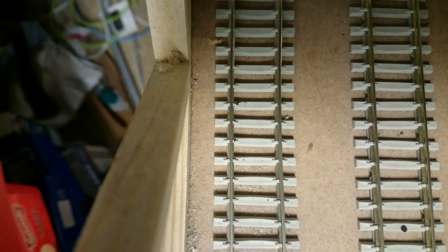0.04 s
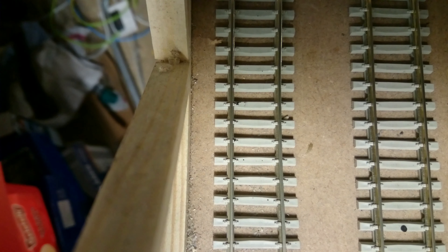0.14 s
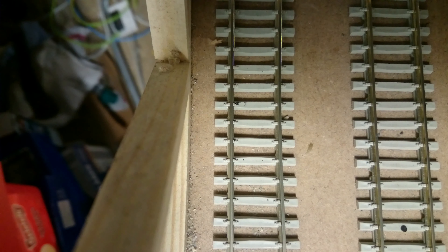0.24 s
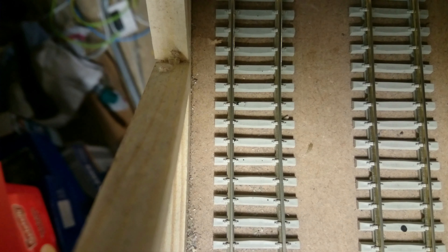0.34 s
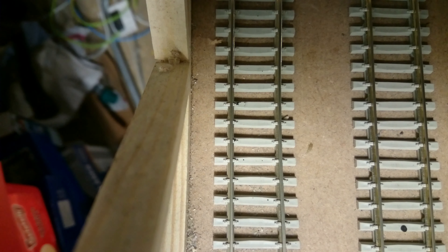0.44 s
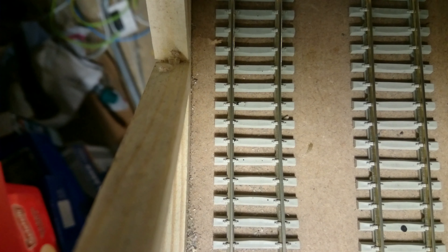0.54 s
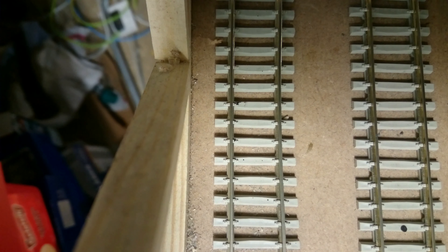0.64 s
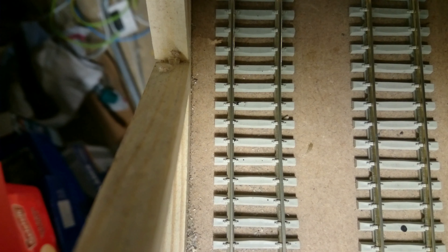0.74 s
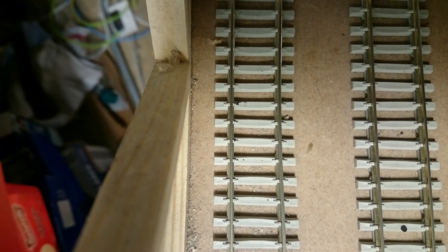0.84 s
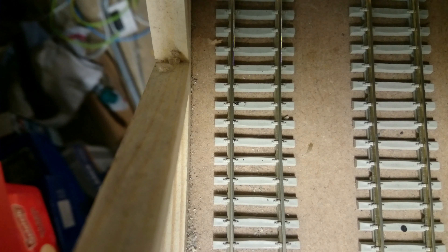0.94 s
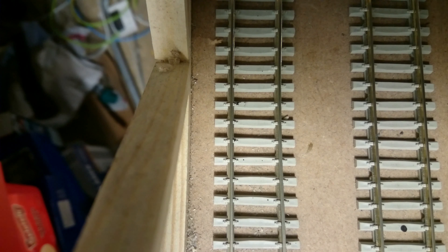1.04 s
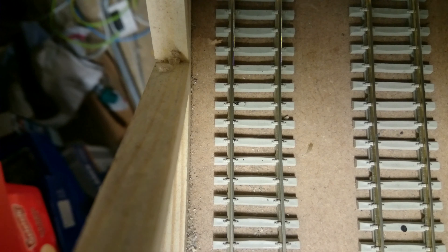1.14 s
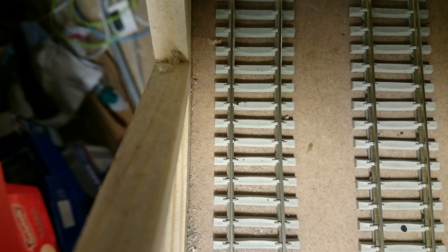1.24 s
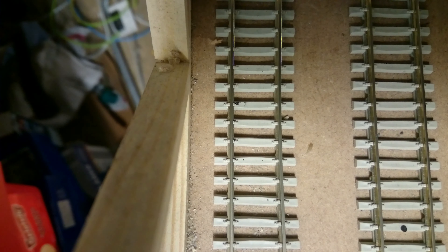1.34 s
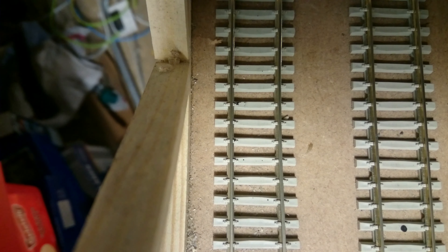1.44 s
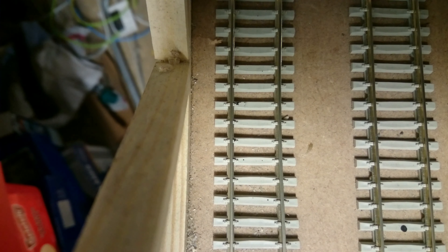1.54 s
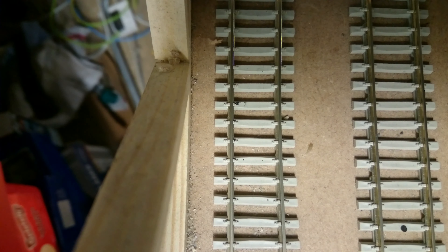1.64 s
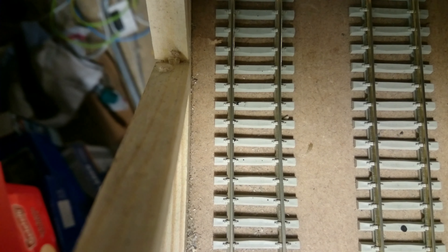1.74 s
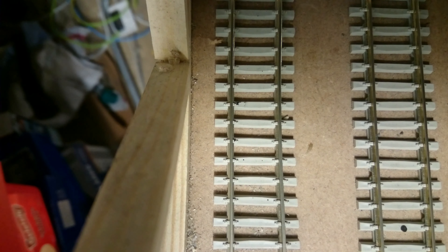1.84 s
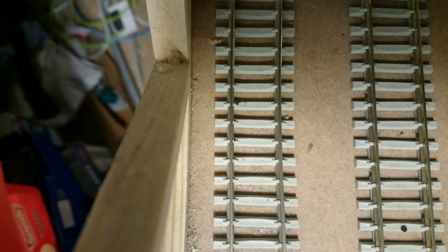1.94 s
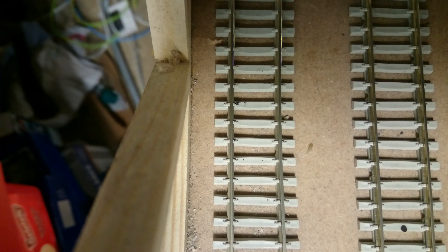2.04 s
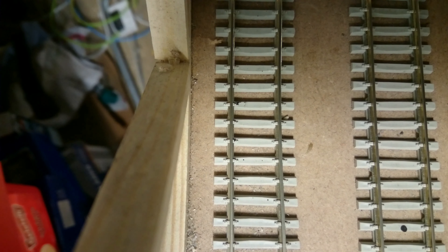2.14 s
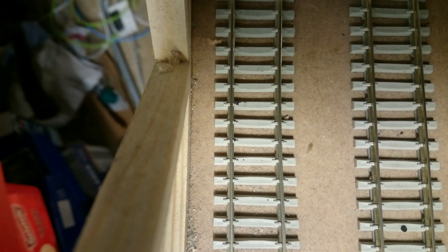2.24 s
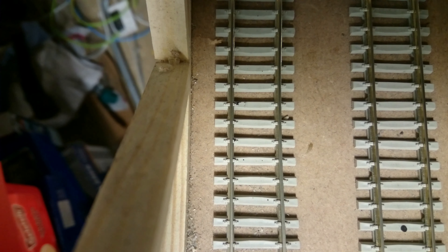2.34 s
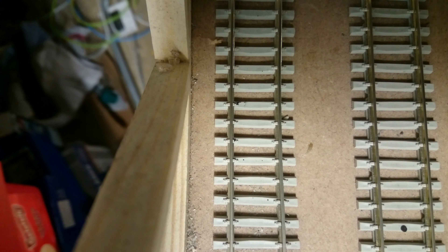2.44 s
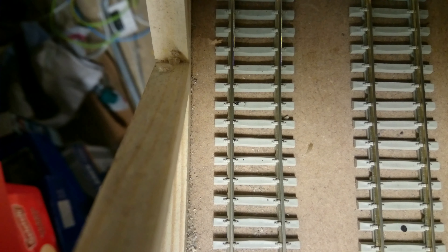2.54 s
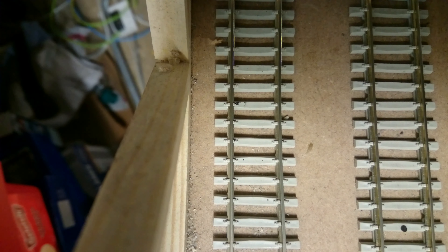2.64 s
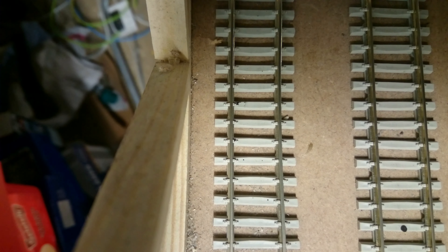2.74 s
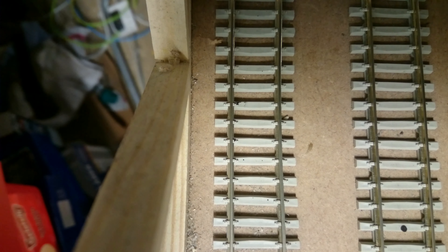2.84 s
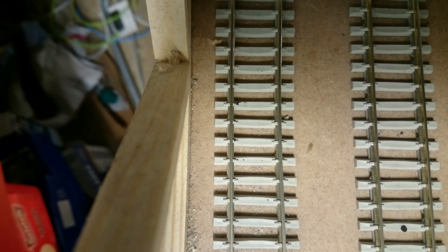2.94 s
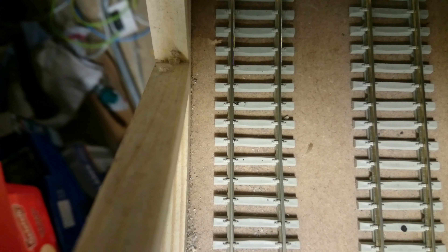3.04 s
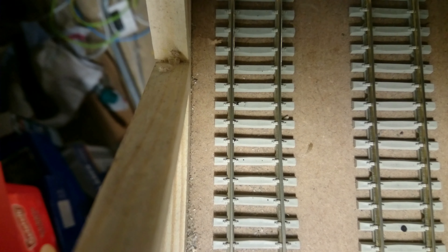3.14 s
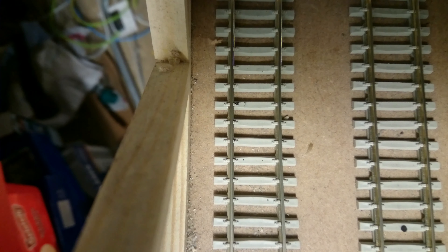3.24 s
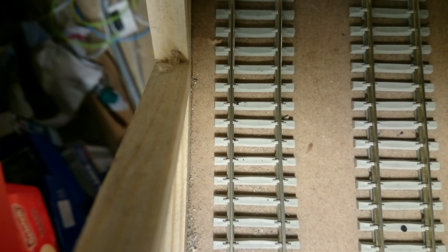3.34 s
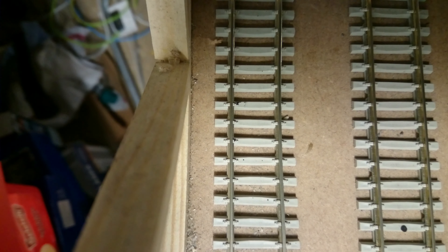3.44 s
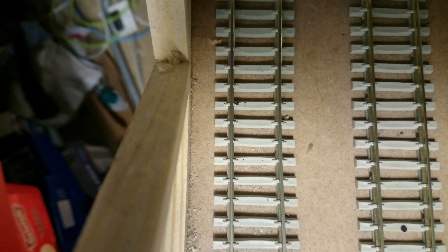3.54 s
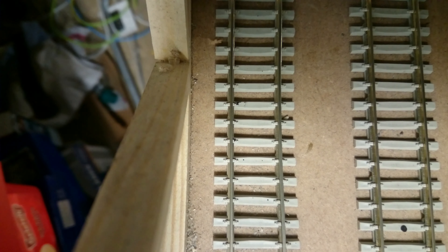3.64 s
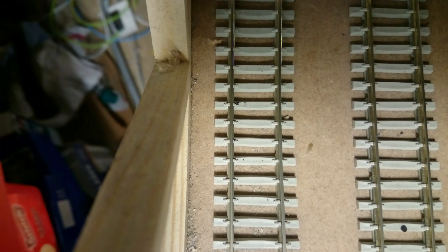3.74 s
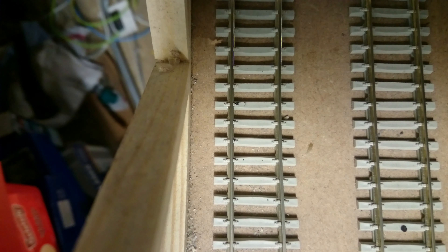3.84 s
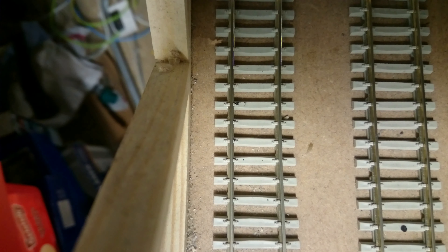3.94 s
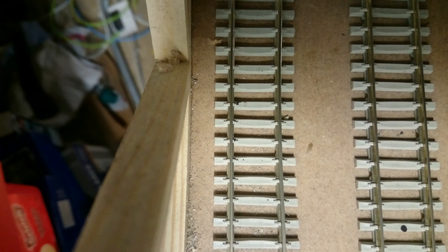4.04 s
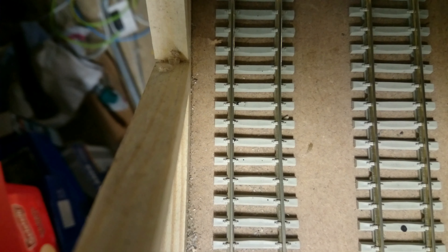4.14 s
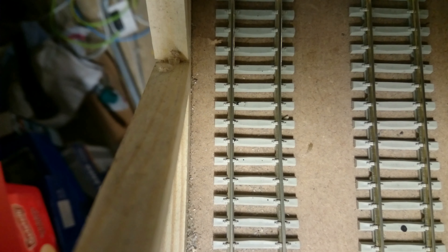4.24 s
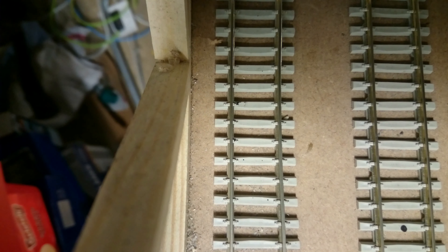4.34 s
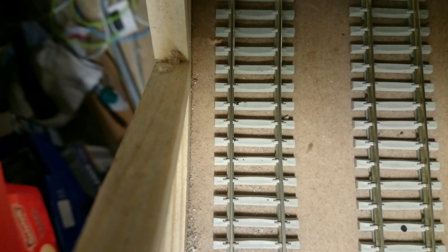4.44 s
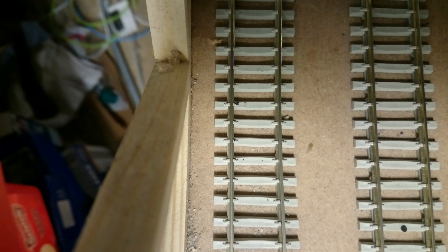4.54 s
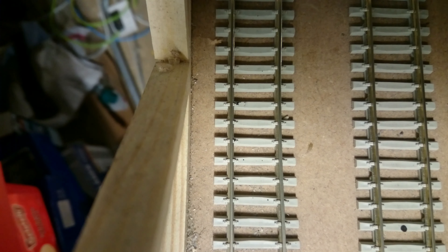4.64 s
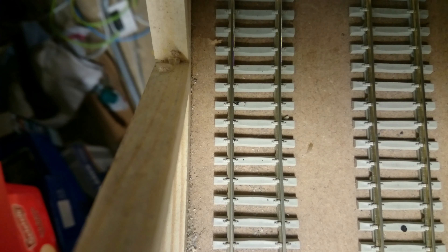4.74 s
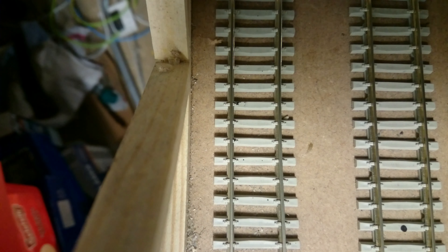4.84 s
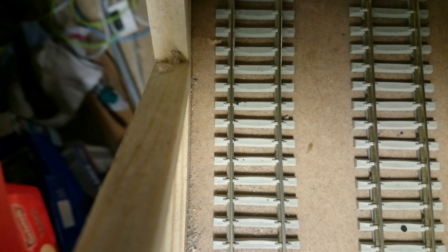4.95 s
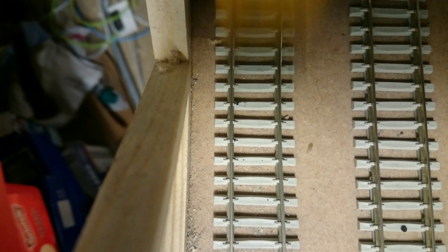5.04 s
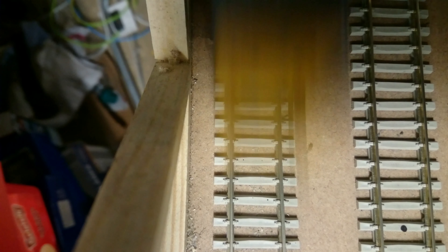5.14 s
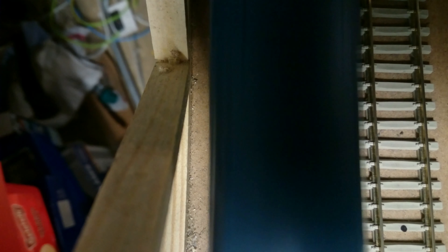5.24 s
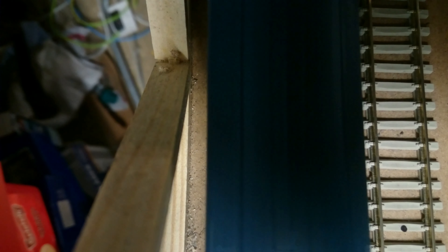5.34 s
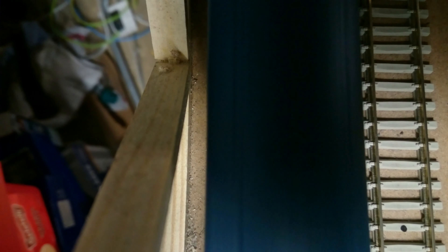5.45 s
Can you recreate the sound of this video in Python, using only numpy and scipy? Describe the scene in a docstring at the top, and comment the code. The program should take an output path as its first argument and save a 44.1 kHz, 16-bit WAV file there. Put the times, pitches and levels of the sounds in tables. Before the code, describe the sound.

A stereo microphone beside miniature rails picks up an electric model train coming nearer indoors. Thin wheel hiss slowly grows, then a bassy, pulsing motor buzz builds through the wood, strongest on the left. Brief dry flange scrapes and light double clicks with woody knocks follow. The bass keeps beating and dips slightly, then the train arrives with harsher grinding and a hollow drone, cut off without fading away.

```python
"""Model train on a wooden baseboard

A model train approaches over the board in a small room and passes under the microphone.
Its motors shake the board with a few beating sines, strongest in the left port; noise bands and whines
make the rumble. Grit coloured by narrow peaks hisses and grinds as wheel noise, swells as flanges
scrape and the shell drones, and clacks at rail joints, where ringing modes also give a knock."""
import sys
import numpy as np
from scipy import signal
from scipy.fft import rfft, irfft, next_fast_len
from scipy.io import wavfile

SR = 44100
rng = np.random.default_rng(int(sys.argv[2]) if len(sys.argv) > 2 else 0)


def inscribe(sig):
    """Save sig as 16-bit PCM at rate SR to the path in sys.argv[1].

    A 1-D sig is mono; a 2-D sig holds one channel per row.
    Samples are clipped to [-1, 1] before scaling.
    """
    pcm = np.round(np.clip(np.atleast_2d(sig).T, -1, 1) * 32767)
    wavfile.write(sys.argv[1], SR, pcm.astype(np.int16))


N = 242550
TIME_S = np.arange(N) / SR
PAD = next_fast_len(N)
HZ = np.maximum(np.arange(PAD // 2 + 1) * SR / PAD, 1)


def from_db(db):
    """Logarithmic level law: decibels to amplitude gain."""
    return 10 ** (np.asarray(db) / 20)


def rms_one(x):
    """Normalization: scale to unit rms."""
    return x / np.sqrt(np.mean(x ** 2) + 1e-20)


def in_time(rows):
    """Linear interpolation: columns of a curve table, one value a sample."""
    s, *columns = np.transpose(rows)
    return [np.interp(TIME_S, s, column) for column in columns]


def at_hz(rows, hz):
    """Interpolation on a log-frequency axis: columns of a spectrum table."""
    f, *columns = np.transpose(rows)
    return np.array([np.interp(np.log(hz), np.log(f), column) for column in columns])


def bumps(modes, hz):
    """Resonance curve: sum of bell-shaped peaks, in the unit of the last column of the modes."""
    return sum(peak / (1 + (2 * (hz - centre_hz) / width_hz) ** 2) for centre_hz, width_hz, peak in modes)


def drift(rate_hz):
    """Low-passed chance: white noise through a double pole at rate_hz wanders slowly with unit rms."""
    step = 40   # samples between computed points
    pole = np.exp(-2 * np.pi * rate_hz * step / SR)
    noise = rng.standard_normal(N // step + 2002)
    slow = signal.lfilter([1], [1, -2 * pole, pole * pole], noise)[2000:]   # drop the onset of the filter
    return np.interp(np.arange(N) / step, np.arange(len(slow)), rms_one(slow))


def port_noise(excitation, colour_db, likeness):
    """Partial coherence: the right port shares some left noise, turned in phase; the ports' mean has rms 1."""
    alike, turn = at_hz(likeness, HZ)
    alike = np.clip(alike, 0, 1)
    left, own = rfft(excitation, PAD)
    shared = alike * np.exp(1j * turn) * left
    right = shared + np.sqrt(1 - alike ** 2) * own
    pair = np.array([left, right]) * from_db(colour_db)
    return pair / np.sqrt(np.mean(irfft(pair, PAD).mean(0) ** 2))


def bands(pair, centres):
    """Filter bank: overlapping bands that add up to the whole sound."""
    for k, hz in enumerate(centres):
        share = np.interp(np.log(HZ), np.log(centres), np.arange(len(centres)) == k)
        yield hz, irfft(pair * share, PAD)[:, :N]


# wandering frequencies of the low board tones, set so that their beats fall in time:
# t/s, upper f/Hz, lower f/Hz, drone f/Hz
TONE_FREQUENCIES = [(0, 78.43, 70.39, 64.27), (.4, 79.54, 70.46, 63.6), (.9, 80.64, 69.92, 62.72),
                    (1.4, 78.9, 70.59, 62.55), (1.9, 80.62, 69.95, 62.71), (2.3, 78.92, 70.01, 63.06),
                    (2.6, 80.03, 70.64, 63.47), (3, 79.21, 70.69, 63.57), (3.3, 78.07, 70.23, 63.32),
                    (3.6, 77.03, 69.57, 62.75), (3.9, 78.29, 69.45, 63.14), (4.2, 78.49, 69.37, 63.45),
                    (4.5, 78.65, 70.04, 63.34), (4.8, 80.73, 70.66, 62.77), (5.1, 80.47, 70.43, 62.04),
                    (5.3, 79.1, 71.6, 63.47), (5.5, 79.34, 71.32, 63.78)]
# how strongly each tone shakes the board: t/s, then level/dB of upper, lower, half-speed tone, low drone
TONE_LEVELS = [(0, -28, -45, -56, -52), (.35, -31, -34.5, -47, -42), (.7, -51, -33.5, -40, -50),
               (1.1, -47, -35, -54, -56), (1.35, -33.5, -30.5, -61, -46), (1.7, -26, -57, -60, -50),
               (2, -23, -50, -51, -43), (2.4, -22.5, -39, -46, -50), (2.62, -19.5, -41, -35.5, -50),
               (2.9, -14, -34, -28.5, -24), (3.3, -9.5, -15, -18.5, -26.5), (3.55, -7.5, -16.5, -18.5, -35),
               (3.8, -12.5, -10, -25, -28), (4.15, -9.5, -13.5, -30, -26), (4.4, -12.5, -7.5, -31, -37),
               (4.6, -44, -8, -37, -45), (4.87, -11.5, -8.5, -27, -15), (5.05, -25, -7.5, -37, -23),
               (5.25, -29, -22.5, -31, -10), (5.3, -15, -18.5, -28, -5.5), (5.4, -27, -33, -37, -24),
               (5.5, -16, -19, -42, -14)]


def motors():
    """Beating of unbalanced rotors: near sines a few Hz apart throb; they are faint in the right port."""
    upper_hz, lower_hz, drone_hz = in_time(TONE_FREQUENCIES)
    upper_db, lower_db, half_db, drone_db = in_time(TONE_LEVELS)
    tones = [(upper_hz, upper_db, -27), (upper_hz / 2, half_db, -31),   # last: right port re left, dB
             (lower_hz, lower_db, -31), (drone_hz, drone_db, -31)]
    out = 0
    for hz, db, right_db in tones:
        phase = 2 * np.pi * np.cumsum(hz) / SR + 0.22 * drift(2.4)   # each tone wavers a little at random
        ports = np.array([np.sin(phase), from_db(right_db) * np.sin(phase - .6)])
        wavering_db = db + 0.43 * drift(4.6)
        out = out + np.sqrt(2) * from_db(wavering_db) * ports
    return out


# course of rolling noise before the layer's colouring: t/s, level/dB
ROLLING_LEVEL = [(0, -42.5), (1, -40), (2.2, -38.5), (2.42, -37), (2.58, -34.5), (2.7, -36.5),
                 (3.25, -33.5), (3.44, -30.5), (3.5, -32.5), (3.7, -32), (3.94, -31.5), (3.99, -34.5),
                 (4.3, -33.5), (4.7, -34), (4.9, -32), (5.2, -29.5), (5.3, -27), (5.5, -26.5)]
# relative spectrum of rolling noise: f/Hz, left level/dB, right level/dB
ROLLING_SPECTRUM = [(114, -75.5, -68.5), (170, -80, -78.5), (304, -84.5, -72.5), (465, -75.5, -71.5),
                    (670, -79, -70), (980, -77.5, -70), (1310, -76.5, -68.5), (1840, -79.5, -67.5),
                    (2520, -76, -70.5), (2960, -73.5, -77.5), (3700, -77.5, -81.5), (4934, -78, -88),
                    (5460, -92.5, -83), (6830, -100, -83), (9100, -106, -90)]
# coherence of rolling noise between ports: f/Hz, common share (0-1), turn of the right port/rad
ROLLING_LIKENESS = [(100, 0.1, 0.67), (250, 0.81, 3.63), (700, 0.21, 2.9), (1500, 0.27, 2.03),
                    (3000, 0.15, 2.2), (5000, 0.13, 2.6), (8000, 0, 0.92)]
# narrow peaks colouring the wheel noise, as from room echoes: f/Hz, width/Hz, level/dB
ROLLING_PEAKS = [(358, 29, 4.5), (400, 17, 4), (523, 120, 5.5), (590, 21, 4.5), (633, 25, 0), (772, 57, 5),
                 (857, 37, 5), (974, 78, 4.5), (1095, 98, 3.5), (1390, 21, 2.5), (1621, 33, 5.5),
                 (1708, 22, 4), (1987, 25, 4), (2132, 35, 5.5), (2940, 100, 2), (4200, 120, 1)]
# resonances of the locomotive shell: f/Hz, width/Hz, weight of the shell level (ratio)
SHELL_RESONANCES = [(406, 66, 0.4), (946, 210, 0.98)]
# resonances of the wheel flanges, left then right port: f/Hz, width/Hz, weight of the scrape level (ratio)
FLANGE_RESONANCES = [
    [(4240, 1300, 0.82)],
    [(3900, 710, 1.3)],
]
# the shell drone grows as the locomotive arrives; its levels are weighted by SHELL_RESONANCES
SHELL_FROM_S, SHELL_DB_PER_S, SHELL_TOP_DB, SHELL_WANDER_DB = 5.143, 45, 11, 0.6
# louder rolling is a little brighter: tilt in dB per octave at the mean level, and its change per dB
BRIGHT_DB_PER_OCTAVE, BRIGHT_PER_DB, MEAN_ROLLING_DB = -0.59, 0.0465, -38
PAN_START_DB, PAN_DB_PER_S = 0.12, 0.92   # left over right: the train moves leftwards
SCRAPE_WANDER_DB = -0.5   # weighted by FLANGE_RESONANCES


def wheels(clack):
    """Roughness excitation: treads on rails give dense grit that flickers as the wagons rock."""
    level_db, = in_time(ROLLING_LEVEL)
    shell_db = np.clip(SHELL_DB_PER_S * (TIME_S - SHELL_FROM_S), 0, SHELL_TOP_DB)
    shell_db = shell_db + SHELL_WANDER_DB * drift(1.3)
    flange_db = scrapes() + SCRAPE_WANDER_DB * drift(1.4)
    bright_db = BRIGHT_DB_PER_OCTAVE + BRIGHT_PER_DB * (level_db - MEAN_ROLLING_DB)
    grit = rng.standard_normal((2, N)) * from_db(0.71 * drift(200))
    spectrum_db = at_hz(ROLLING_SPECTRUM, HZ) + bumps(ROLLING_PEAKS, HZ)
    pair = port_noise(grit, spectrum_db, ROLLING_LIKENESS)
    rocking_db = 0.3 * drift(10)
    out = 0
    for hz, band in bands(pair, np.geomspace(120, 8000, 19)):
        colour_db = bright_db * np.log2(hz / 1400) + shell_db * bumps(SHELL_RESONANCES, hz)
        flange_weights = [bumps(port, hz) for port in FLANGE_RESONANCES]
        colour_db = colour_db + np.outer(flange_weights, flange_db)
        out = out + band * from_db(colour_db + rocking_db + 1.2 * drift(12))
    level = from_db(level_db) + from_db(-8.5) * clack
    pan_db = np.outer([.5, -.5], PAN_START_DB + PAN_DB_PER_S * TIME_S)
    return level * out * from_db(pan_db)


# flanges rub the rail: start t/s, end t/s (both at half rise), level/dB before the flange weights
SCRAPE_TIMES = [(2.736, 3.0, 4), (3.022, 3.28, 9.5), (3.292, 3.473, 6), (3.624, 3.938, 5.5),
                (5.166, 5.266, 5)]
SCRAPE_EDGE_S = 0.073


def scrapes():
    """Frictional excitation: the level in dB of each rub fades in, holds and fades out."""
    out = 0
    for start, end, db in SCRAPE_TIMES:
        inside_s = np.minimum(TIME_S - start, end - TIME_S)
        out = out + db * np.clip(inside_s / SCRAPE_EDGE_S + .5, 0, 1)
    return out


# wheels over rail joints: t/s, clack level/dB before layer gains, clack t60/s, thud level/dB re clack
RAIL_JOINTS = [(3.283, -21.5, 0.027, -13), (3.2951, -29, 0.036, 0.5), (3.404, -28, 0.025, -6),
               (3.4387, -23.5, 0.022, -12), (3.8126, -21, 0.023, -17), (3.9394, -39, 0.019, -8),
               (4.9617, -27, 0.0255, -10), (5.2595, -32, 0.023, -8), (5.3203, -23, 0.019, -7)]
THUD_T60_S = .09


def joints():
    """Impact and exponential decay: envelopes of clack and thud rise suddenly, then die away."""
    clack, thud = np.zeros(N), np.zeros(N)
    for s, db, t60, thud_db in RAIL_JOINTS:
        span = slice(round(s * SR), min(N, round((s + 0.35) * SR)))
        since_s = TIME_S[span] - s
        clack[span] += from_db(db - 60 * since_s / t60)
        thud[span] += from_db(db + thud_db - 60 * since_s / THUD_T60_S)
    return clack, thud


# what a joint strikes in board and rail: f/Hz, t60/s, left level/dB, right level/dB re thud
STRUCK_MODES = [(237, 0.091, 4.5, -1.5), (330, .05, 0.5, -3.5), (1900, .012, -10, -4),
                (3900, .008, -4, -5.5), (7000, .004, -23, -1.5)]


def knocks():
    """Impulse response: each joint gives one hard click that sets board and rail ringing briefly."""
    s, db, _, thud_db = np.transpose(RAIL_JOINTS)
    clicks = np.full(N, 1e-18)
    clicks[np.round(s * SR).astype(int)] = from_db(db + thud_db)
    out = 0
    for hz, t60, *ports_db in STRUCK_MODES:
        r, w = from_db(-60 / (t60 * SR)), 2 * np.pi * hz / SR   # decay and turn per sample
        ringing = signal.lfilter([0, np.sin(w)], [1, -2 * r * np.cos(w), r * r], clicks)
        out = out + np.outer(from_db(ports_db), ringing)
    return out


# course of the board rumble before the layer's colouring and gain: t/s, level/dB
RUMBLE_LEVEL = [(0, -49), (.6, -48.5), (1, -52), (2, -51), (2.4, -40.5), (2.62, -47), (3.1, -33.5),
                (3.27, -40.5), (3.31, -26.5), (3.45, -30), (3.85, -28.5), (4.05, -29.5), (4.35, -30),
                (4.6, -31.5), (5.05, -33.5), (5.22, -29.5), (5.43, -25), (5.5, -35)]
# relative spectrum of the board's broad shaking: f/Hz, left level/dB, right level/dB
BOARD_SPECTRUM = [(22, -64, -74.5), (38, -51.5, -71), (54, -36.5, -62.5), (70.6, -27.5, -56.5),
                  (95, -42.5, -57), (111, -44, -69), (129, -41.5, -61.5), (152.2, -46, -61),
                  (173, -53, -68.5), (197, -59, -64), (252, -52, -54.5), (328, -53.5, -61), (428, -60, -54),
                  (634, -73.5, -66)]
# coherence of the rumble between ports: f/Hz, common share (0-1), turn of the right port/rad
RUMBLE_LIKENESS = [(60, 0.6, .3), (149, 0.34, .5), (297, 0.48, 2.52)]
# resonance of the board panel: f/Hz, width/Hz, weight of the boom level (ratio)
PANEL_RESONANCES = [(127, 89, 0.73)]
# whines locked to the upper tone: multiple of its f, share of its level swing followed (0-1),
# left level/dB, right level/dB re rumble course
MOTOR_WHINES = [(2.0, 0.9, 0, -9), (2.5, 0.1, -5.5, -24), (3.5, .2, -13, -17.5)]
BOOM_DB, BOOM_WANDER_DB = 0.5, 4.5   # weighted by PANEL_RESONANCES
# until the train rolls onto the near board, its rumble lacks: f/Hz, width/Hz, level/dB
NEAR_BOARD_S, FAR_BOARD_MODES = 3.5, [(330, 150, -2.5)]
MOTOR_OVER_RUMBLE_DB = 25   # usual lead of the upper tone over the rumble course


def board(thud):
    """Forced vibration of a plate: the board shakes broadly under the train; motor whines ride on it."""
    level_db, = in_time(RUMBLE_LEVEL)
    far = TIME_S < NEAR_BOARD_S
    boom_db = BOOM_DB + BOOM_WANDER_DB * drift(1.3)
    rolloff_db = 24 * np.log2(np.maximum(HZ / 600, 1))
    spectrum_db = at_hz(BOARD_SPECTRUM, HZ) - rolloff_db
    pair = port_noise(rng.standard_normal((2, N)), spectrum_db, RUMBLE_LIKENESS)
    shaking = 0
    for hz, band in bands(pair, np.geomspace(33, 600, 11)):
        colour_db = boom_db * bumps(PANEL_RESONANCES, hz) + far * bumps(FAR_BOARD_MODES, hz)
        shaking = shaking + band * from_db(colour_db + 1.6 * drift(4.6))
    turns = np.cumsum(in_time(TONE_FREQUENCIES)[0]) / SR
    swing_db = in_time(TONE_LEVELS)[0] - level_db - MOTOR_OVER_RUMBLE_DB
    whines = 0
    for multiple, follows, *ports_db in MOTOR_WHINES:
        gain = from_db(follows * swing_db + 1.6 * drift(1.8))
        whine = gain * np.sin(2 * np.pi * multiple * turns + 0.68 * drift(5.9))
        whines = whines + np.outer(from_db(ports_db), whine)
    level = from_db(level_db) + from_db(-19.0) * thud
    return level * (from_db(6.5) * shaking + whines)


HISS_HZ, HISS_DB = 6500, (-80.5, -55.5)   # microphone hiss: lower edge; left and right level


def hiss():
    """Incoherent stationary noise: steady and thin at the top, own in each port."""
    high = signal.butter(4, HISS_HZ, "high", fs=SR, output="sos")
    noise = signal.sosfilt(high, rng.standard_normal((2, N)))
    return from_db(HISS_DB)[:, None] * rms_one(noise)


def scene():
    """Superposition: motors and rumble through the wood, wheels through the air, and knocks."""
    clack, thud = joints()
    return motors() + wheels(clack) + knocks() + board(thud)


CEILING = 1.2   # amplitude limit of the rounding
CUTOFF_HZ = 8030, 8080   # left, right port


def record(dry):
    """Saturation and band limiting: the microphone hisses, peaks are rounded, each port's top is cut."""
    rounded = CEILING * np.tanh((dry + hiss()) / CEILING)
    cuts = [signal.ellip(14, .5, 80, hz, fs=SR, output="sos") for hz in CUTOFF_HZ]
    return np.array([signal.sosfilt(cut, port) for cut, port in zip(cuts, rounded)])


dry = scene()
out = record(dry)
inscribe(out)
```